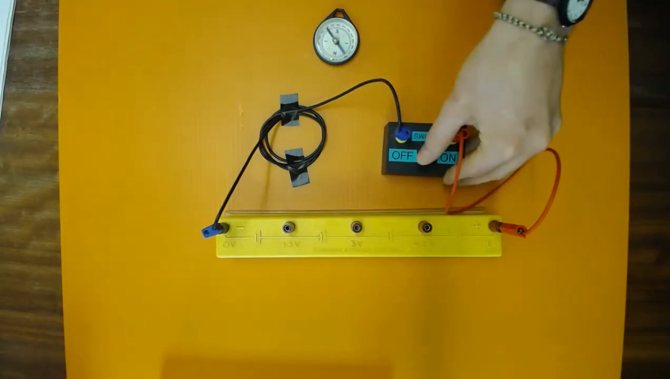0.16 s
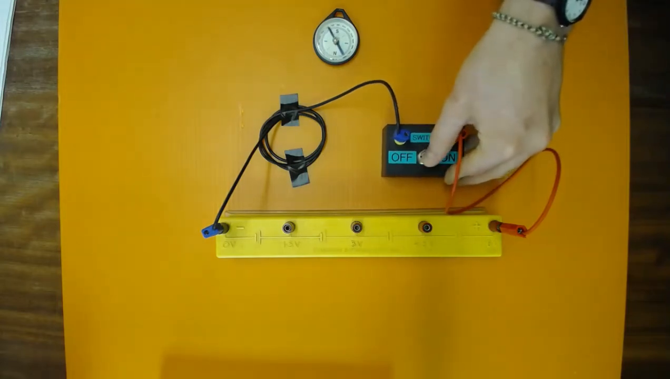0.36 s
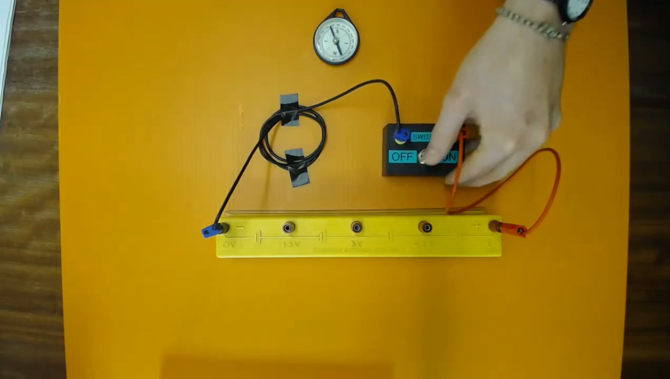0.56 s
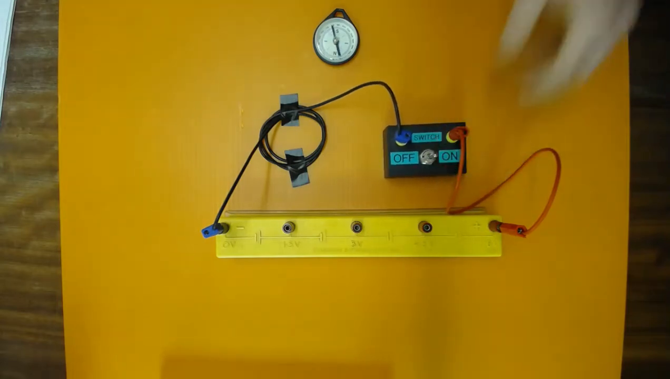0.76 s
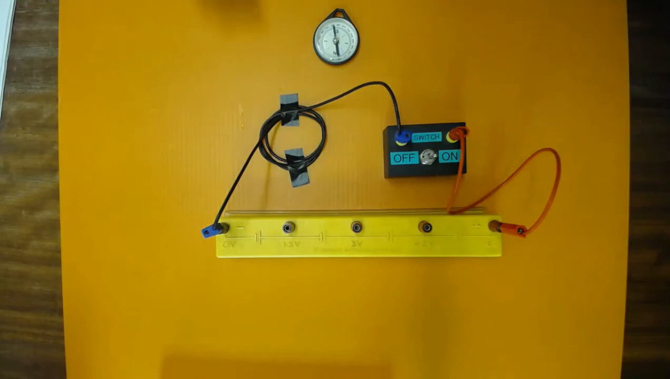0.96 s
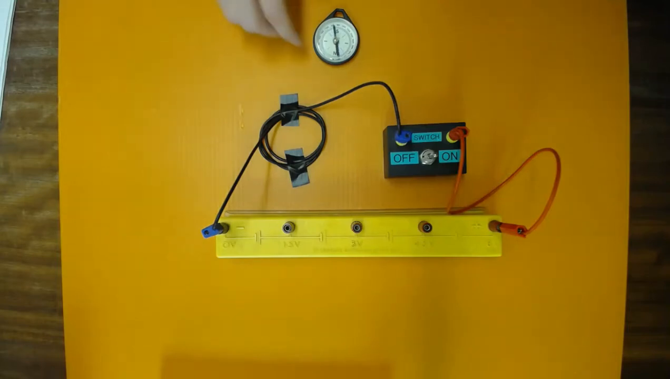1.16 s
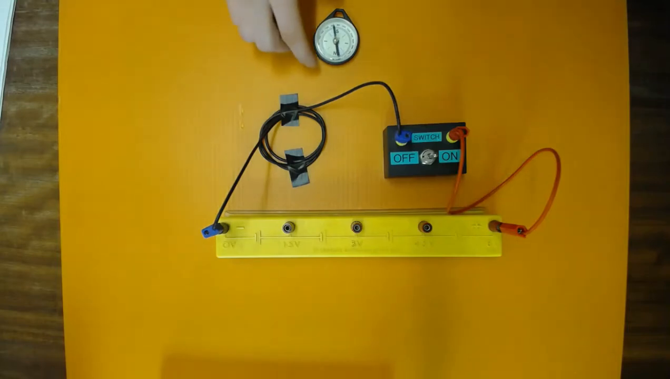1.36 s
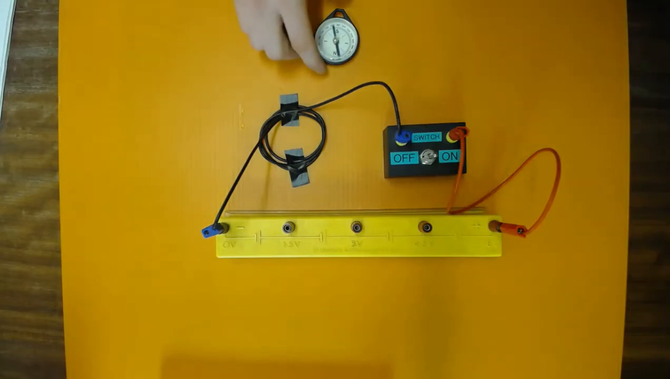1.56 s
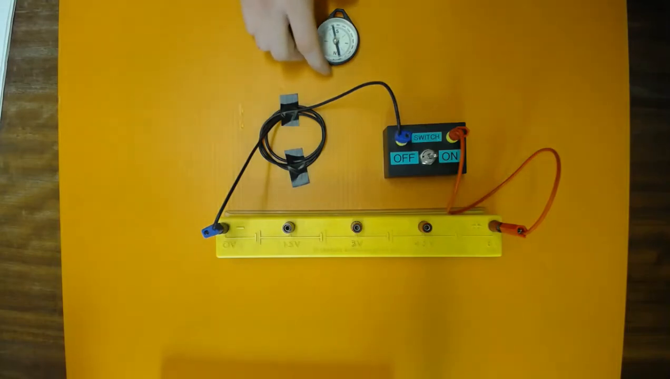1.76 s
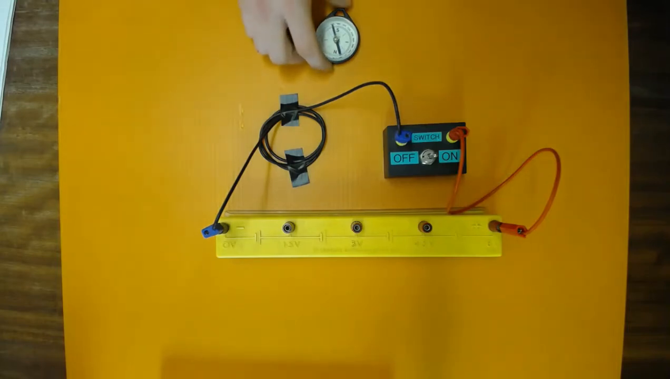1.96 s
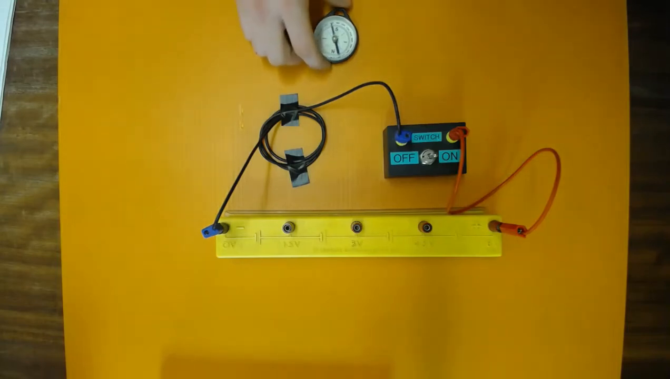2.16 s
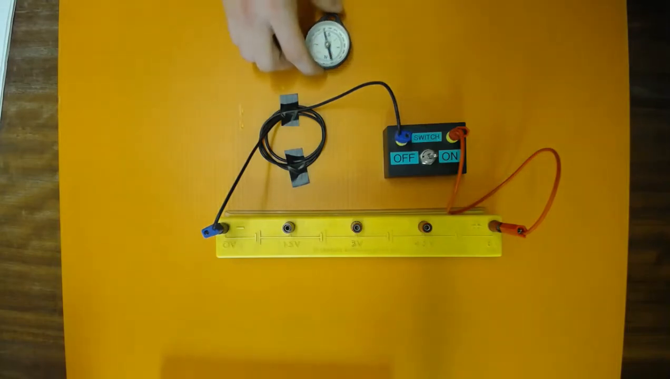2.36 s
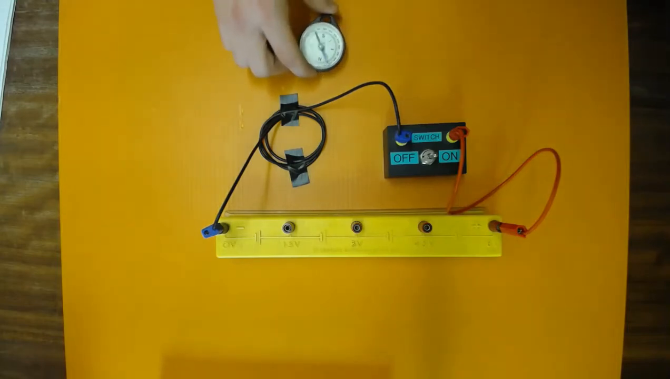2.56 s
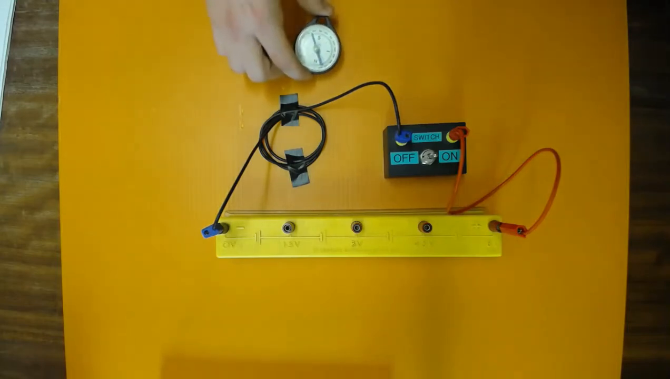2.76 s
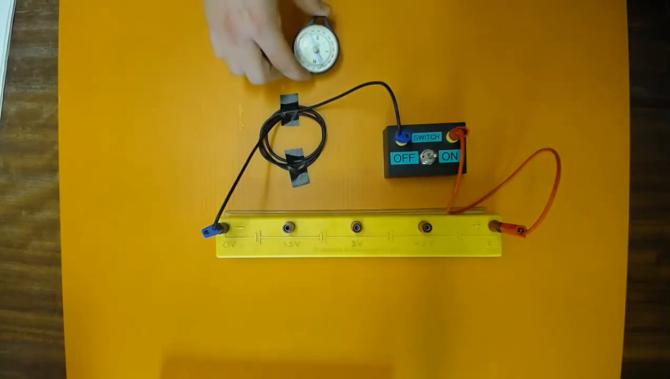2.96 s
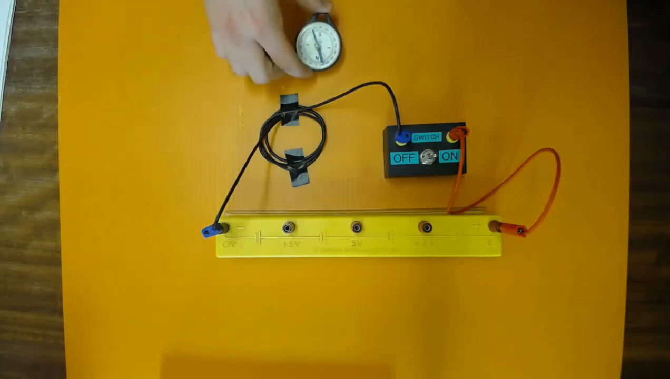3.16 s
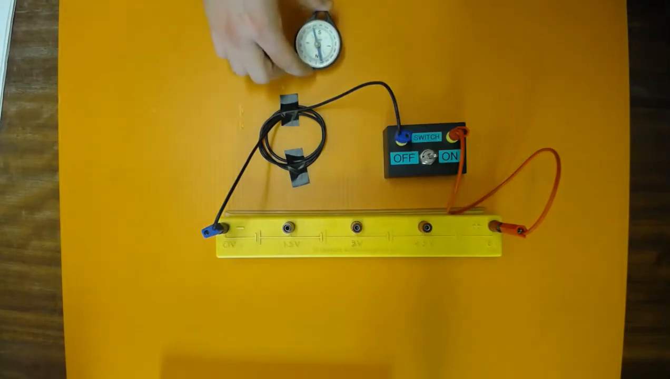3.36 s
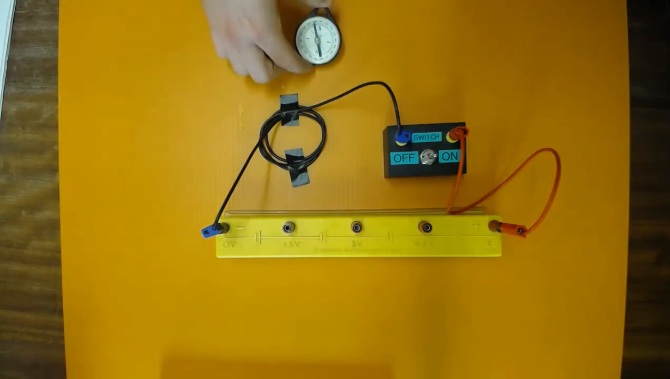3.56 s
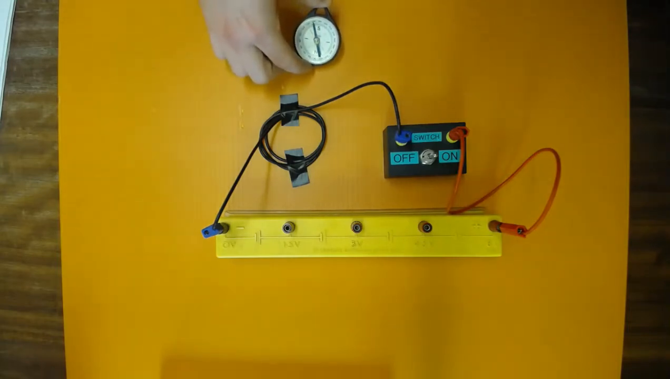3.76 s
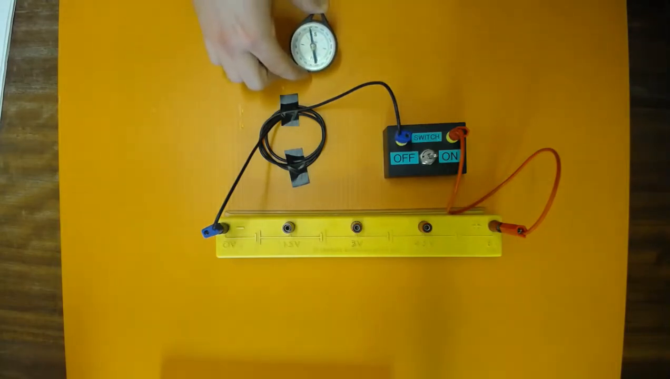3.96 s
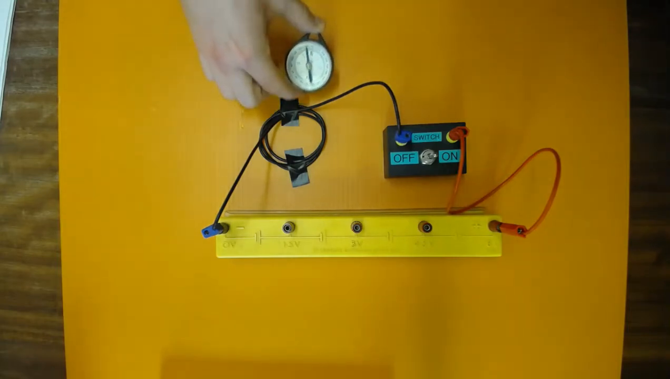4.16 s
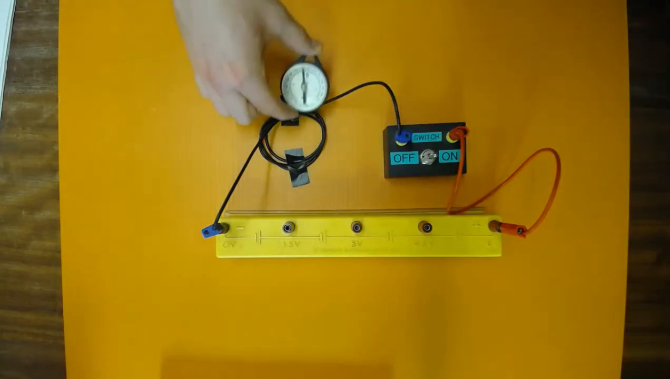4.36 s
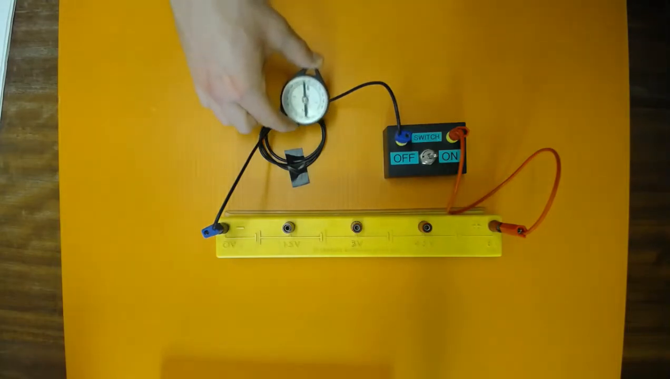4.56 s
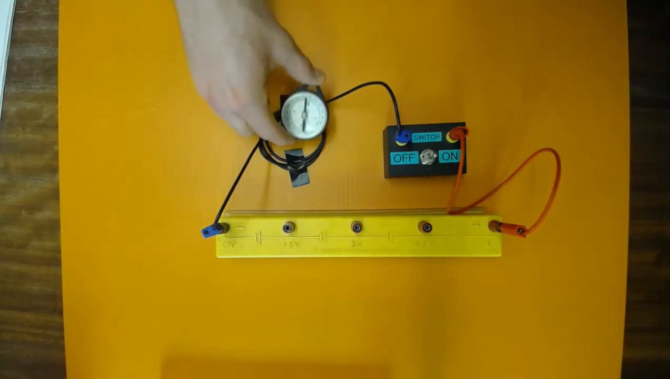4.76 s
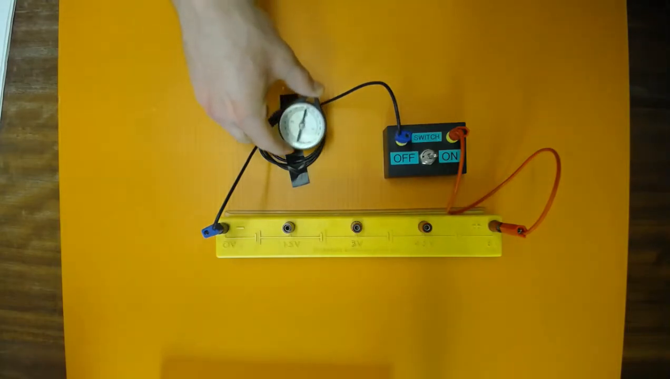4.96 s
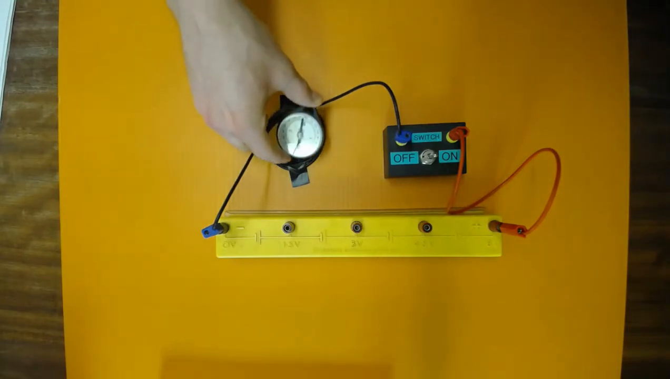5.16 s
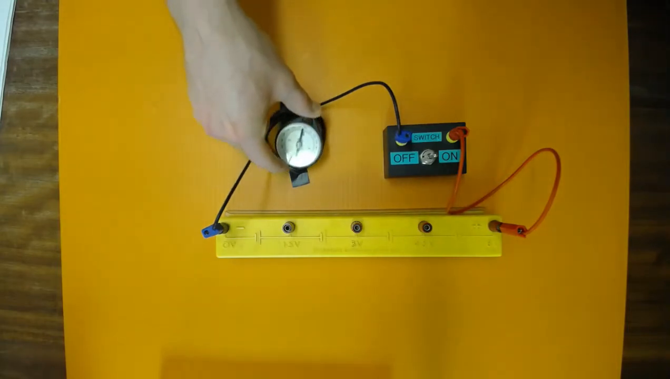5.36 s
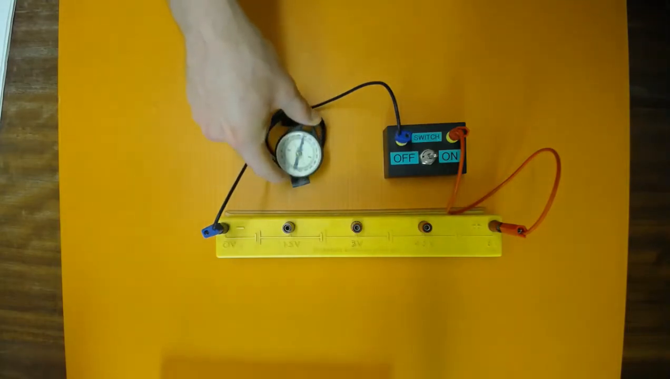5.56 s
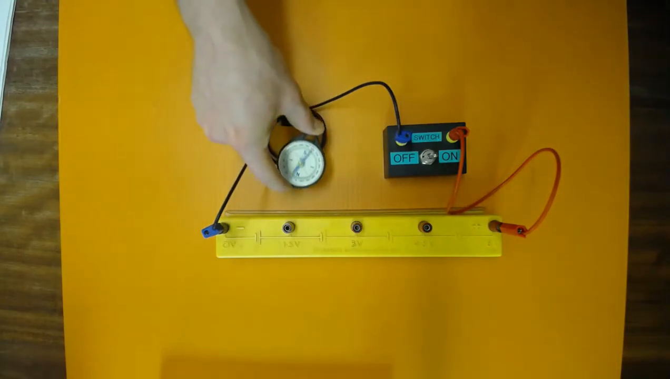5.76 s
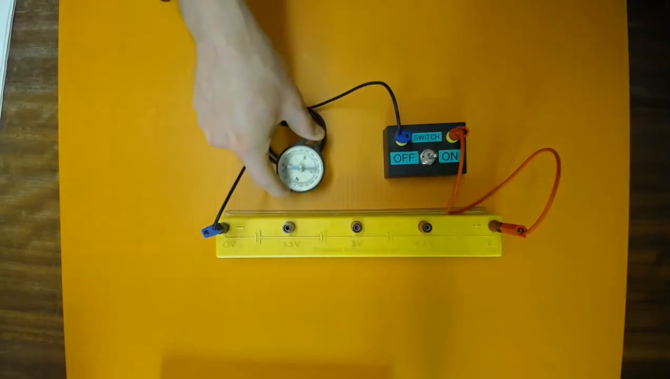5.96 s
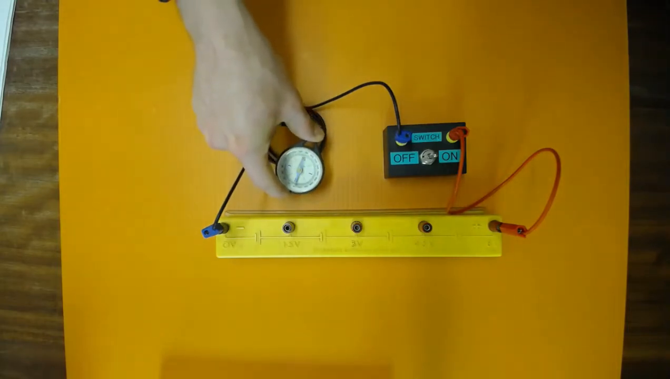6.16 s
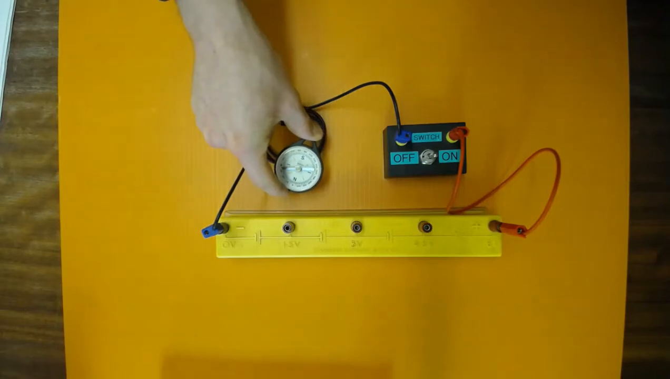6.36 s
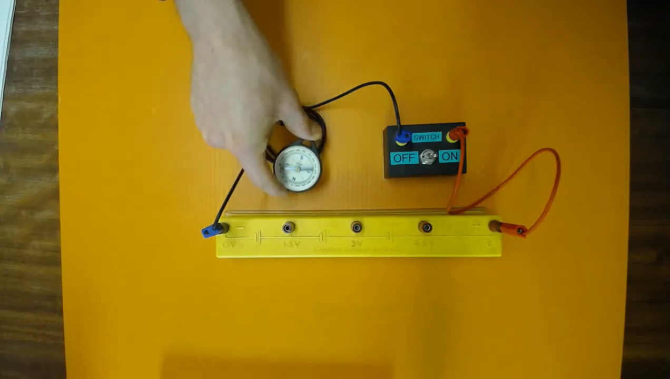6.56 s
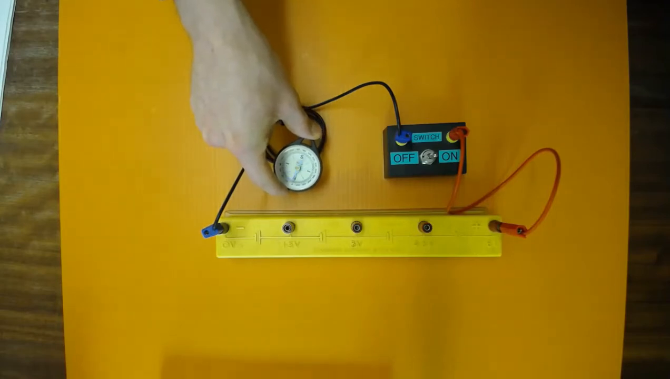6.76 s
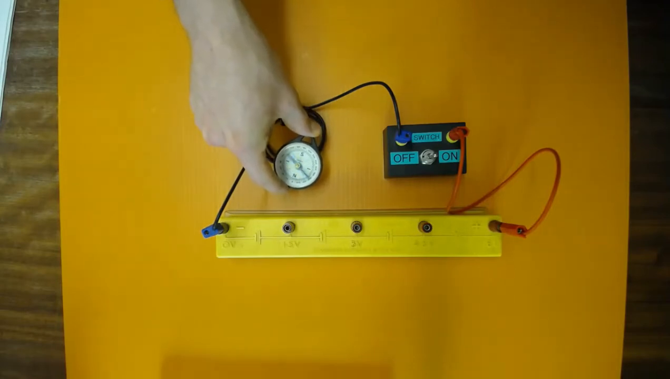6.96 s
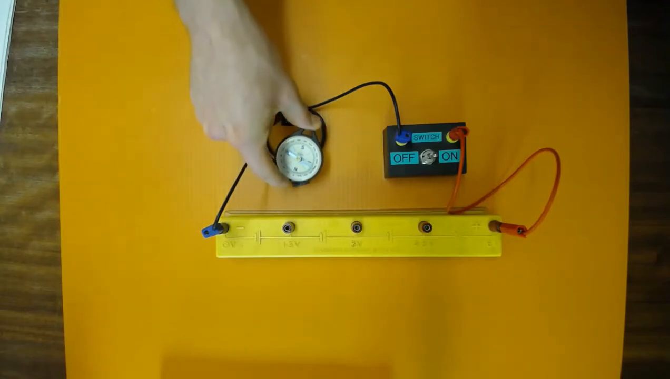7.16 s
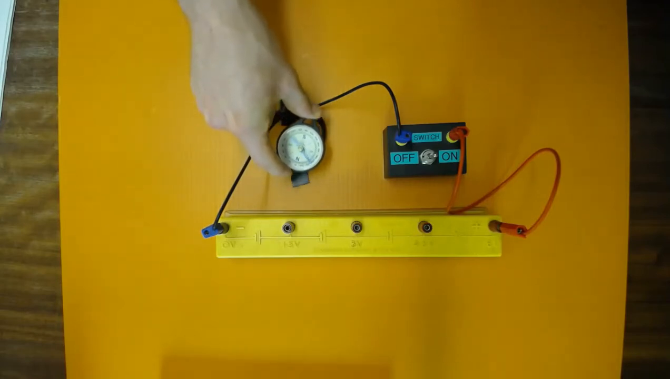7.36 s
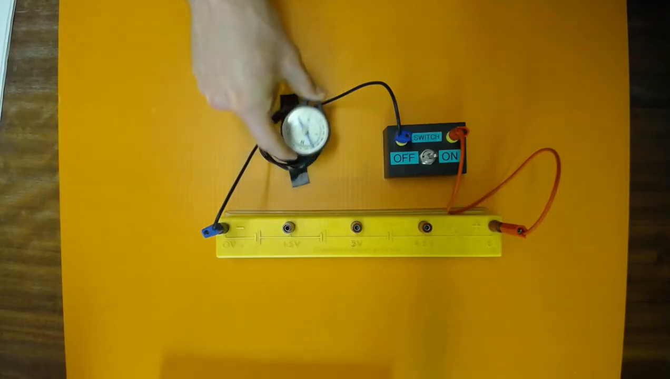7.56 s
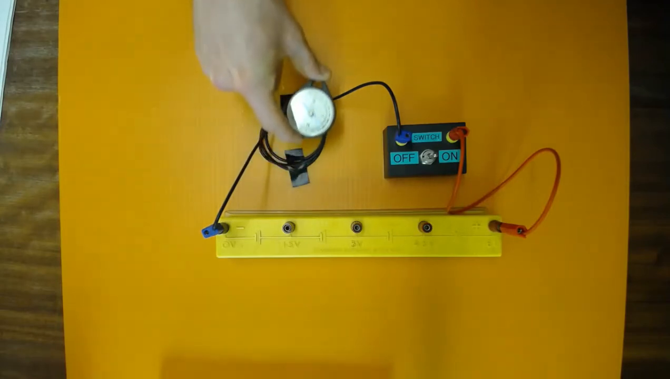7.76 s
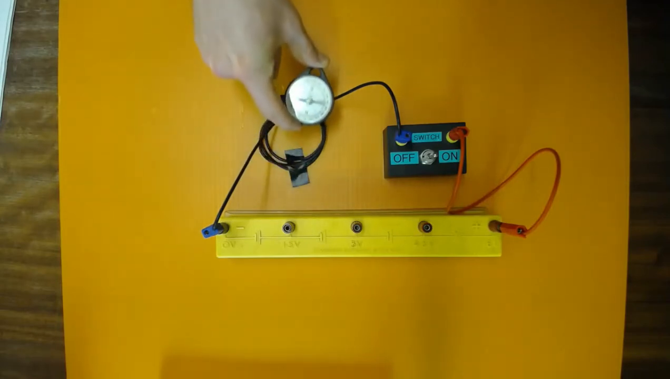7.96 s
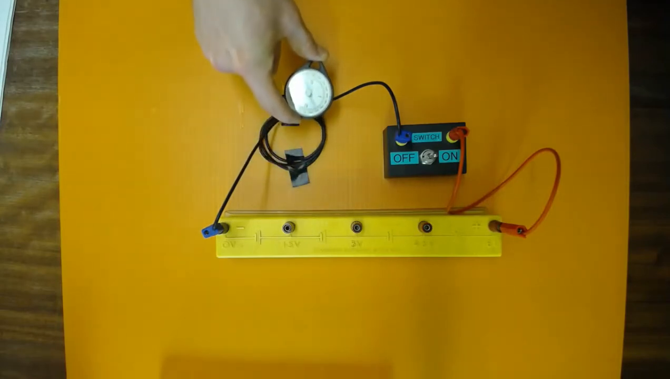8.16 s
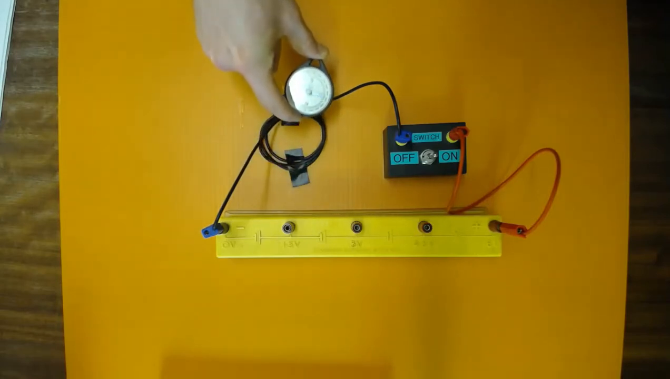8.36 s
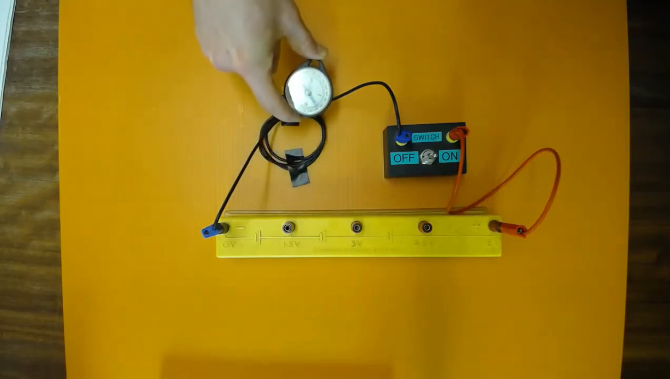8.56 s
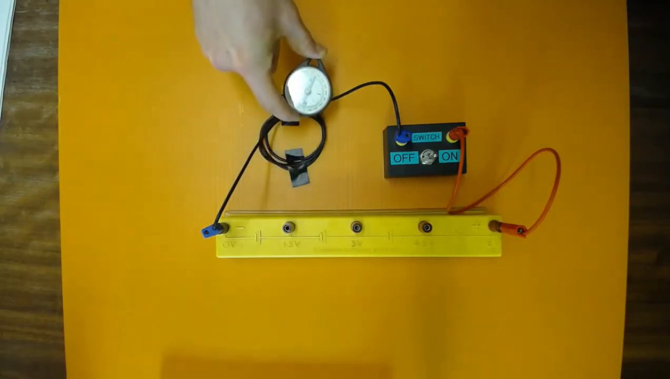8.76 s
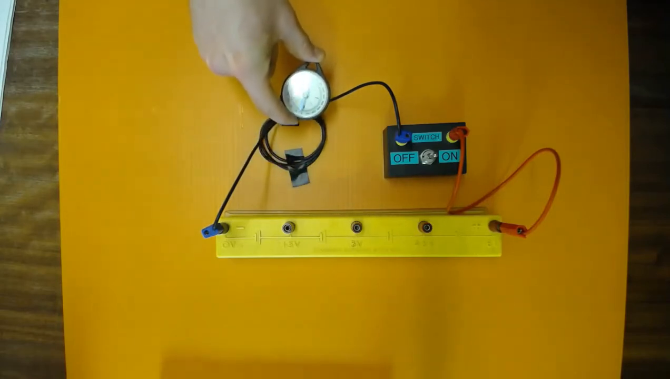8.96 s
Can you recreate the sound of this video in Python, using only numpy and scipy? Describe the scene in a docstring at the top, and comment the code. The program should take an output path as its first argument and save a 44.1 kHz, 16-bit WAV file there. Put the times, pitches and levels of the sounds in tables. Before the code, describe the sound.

A single hard switch snap on a small plastic box in a humming room, then irregular tiny metallic ticks from a handled compass.

```python
"""Toggle switch and pocket compass

Indoors, in a hard, humming room: ventilation, fan tones and a faint electrical whine. A stereo pair hears
a sprung lever slam over once on a small plastic box, right of centre; box modes ring and the table knocks.
A hand slides a pocket compass about: each needle strike is a burst of chatter that rings the metal case.
Filtered noise gives the rubs, the soft boom of the table top and swells in the room's answer to the snap;
a decaying echo answers snap and needle."""
import sys
import numpy as np
from scipy import signal
from scipy.fft import rfft, irfft, next_fast_len
from scipy.io import wavfile
from scipy.ndimage import map_coordinates

SR = 44100
rng = np.random.default_rng(int(sys.argv[2]) if len(sys.argv) > 2 else 0)


def pcm_store(signal):
    """Save signal as 16-bit PCM."""
    levels = np.round(np.clip(np.atleast_2d(signal), -1, 1) * 32767)
    wavfile.write(sys.argv[1], SR, levels.astype(np.int16).T)


N = 397341  # length [samples]

# Ventilation tones before the overall trim: (frequency [Hz], level [dB])
FAN_TONES = [(301.5, -71), (398.4, -78), (495.3, -76.5), (592.2, -82), (678.3, -73.5), (947.5, -87),
             (1012, -76.5), (1125, -89), (1303, -86)]
# Colour of the rush of air: (frequency [Hz], relative density [dB per Hz])
AIR_COLOUR = [(25, -8), (60, -8), (120, -8.5), (250, -9.5), (400, -7.5), (540, -7.5), (700, -2),
              (860, -10.5), (1200, -12.5), (1700, -22), (3000, -28.5), (5000, -35), (8000, -37),
              (10000, -40.5), (15500, -44.5)]
# Faint electrical whine, beating in the treble: (frequency [Hz], level [dB])
WHINE_TONES = [(2080, -95), (3000, -96.5), (7980, -107), (8000, -103), (8020, -107)]
# Likeness of left and right in diffuse sound: (frequency [Hz], correlation [-1 to 1])
LIKENESS = [(60, 0.65), (150, 1), (300, 0.74), (640, 0.88), (1400, 0.12), (3000, 0.015), (15000, 0)]
# Decay of the room: (frequency [Hz], T60 [s])
ROOM_DECAY = [(150, 0.82), (700, 1), (3000, 1.1), (5000, .85), (8000, .58), (14000, .35)]
# Strength of the room's long tail: (frequency [Hz], level [dB])
ROOM_LEVEL = [(150, -14.5), (1400, -15.5), (14000, -19)]
# The snap as it spreads in all directions: (frequency [Hz], relative density [dB per Hz])
SPREAD_COLOUR = [(50, -20), (110, -0.5), (190, 14), (290, 11.5), (470, 4.5), (750, 1.5), (1400, -0.5),
                 (2100, -5.5), (2600, -4.5), (3100, 0.5), (4000, -5), (4900, -1), (5800, -8.5),
                 (7000, -8.5), (10500, -17), (14000, -36)]
# Soft low and mid swells in the room's dying answer to the snap:
# (time [s], level [dB], length [s], frequency [Hz])
SNAP_TAIL_SWELLS = [(.405, -42.5, .055, 255), (.5, -53, 0.17, 260), (.622, -54, 0.032, 800),
                    (.705, -59.5, 0.029, 1138)]

# The hand leans on or drags over the table, before the boom's gains: (time [s], length [s], level [dB])
HAND_PRESSES = [(0.022, 0.11, -60.5), (0.196, 0.04, -60.5), (0.932, 0.073, -64), (2.087, 0.03, -62),
                (2.207, 0.076, -59.5), (2.353, 0.15, -59), (2.698, 0.093, -62.5), (3.552, 0.029, -61.5),
                (3.959, 0.03, -63.5), (4.322, 0.078, -62), (4.5, 0.044, -63), (4.961, 0.074, -59.5),
                (5.781, 0.05, -57.5), (5.925, 0.15, -59)]
# Faint sliding of lever and skin: (time [s], level [dB], length [s], frequency [Hz])
SKIN_BRUSHES = [(.338, -67, 0.016, 3170), (.93, -82.5, 0.19, 9400), (1.82, -83.5, 0.27, 6000),
                (1.968, -71.5, 0.014, 5940)]

# The needle strikes the case:
# (time [s], level before the body trim [dB], favoured pitch [Hz], treble relative to that level [dB])
NEEDLE_STRIKES = [(0.2012, -54.5, 3100, -22.5), (2.2847, -64.5, 3110, -23), (2.384, -43.5, 4020, -31),
                  (2.5286, -55.5, 3810, -23), (2.5768, -45.5, 4440, -22), (2.6851, -48.5, 4360, -19.5),
                  (3.0636, -62.5, 4400, -14), (3.19, -58.5, 4600, -17), (3.2958, -58.5, 4556, -20),
                  (3.3892, -49, 4383, -15.5), (3.4916, -49.5, 4300, -16), (3.612, -57, 4940, -17),
                  (3.7223, -66, 4330, -15), (3.9376, -62.5, 4880, -13.5), (4.1592, -61.5, 3220, -11.5),
                  (4.2837, -49.5, 3320, -13.5), (4.5144, -62.5, 3220, -12), (4.7663, -54, 3110, -13.5),
                  (4.7745, -52.5, 3210, -25), (4.879, -45.5, 3202, -12), (4.9312, -60, 3110, -11),
                  (5.0385, -44.5, 3170, -16), (5.534, -49, 6000, -14), (5.6502, -60.5, 4980, -15),
                  (5.7426, -38.5, 4330, -11), (5.8354, -50, 6000, -5.5), (5.9354, -57.5, 3100, -8),
                  (6.0366, -48.5, 4270, -12.5), (6.1506, -49, 2837, -9.5), (6.3308, -57.5, 6000, -12.5),
                  (6.5739, -61.5, 6000, -8.5), (6.7418, -55.5, 3170, -24), (7.1186, -59.5, 4410, -13.5),
                  (7.235, -65, 6040, -8.5), (7.4594, -71, 2710, -11), (8.096, -48, 3190, -17.5),
                  (8.2068, -55.5, 3190, -14), (8.2688, -57, 6020, -6), (8.3699, -53.5, 6050, -4),
                  (8.4783, -64, 6060, -3)]
# Modes of the compass case: (frequency [Hz], relative level [dB], T60 [s])
CASE_MODES = [(2415, -1.5, .008), (3165, 1.5, 0.017), (3681, -9, .008), (4353, -2, 0.02), (4930, -9.5, .01),
              (6100, 0.5, 0.04067), (6520, -7, 0.0077), (7336, -5.5, 0.0099), (8150, -2.5, 0.016),
              (9740, -10, .008), (11900, -14.5, 0.016)]
# Colour of the needle's click: (frequency [Hz], relative density [dB per Hz])
CLICK_COLOUR = [(1500, -29), (2400, -1), (5000, 0.5), (8000, -1.5), (11000, -14), (16000, -18)]

# Contacts of the snap: (time [s], relative level [dB], length [s])
SNAP_CONTACTS = [(.3800, -16.5, 0.00087), (0.3806, -1, .0014), (.3824, 1.5, 0.0025), (.3868, -18, .004),
                 (.3922, -16.5, .002)]
# Modes of lever and box: (frequency [Hz], relative level [dB], T60 [s])
BOX_MODES = [(1384, -5.5, .018), (1670, -8.5, 0.017), (2108.5, -3.5, 0.032), (2460, -3, .024),
             (3000, 2, 0.012), (3308, -2.5, .028), (3600, -6.5, .015), (4710, -1, .022), (5066, -5, .024),
             (5446, -5.5, 0.017), (6138, -2, 0.0054), (6974, -4, 0.021), (9662, -14, .012),
             (10400, -11.5, 0.016)]
# Modes of the box on the table: (frequency [Hz], relative level [dB], T60 [s])
THUD_MODES = [(199, -7.5, 0.02), (285, 1.5, 0.033), (515, -20.5, .02), (737, 2, 0.023), (985, -4, 0.025)]
# Colour of the snap's crack: (frequency [Hz], relative density [dB per Hz])
CRACK_COLOUR = [(60, -51.5), (400, -26), (1500, -5), (2200, -4.5), (2650, -11.5), (3200, 0), (4100, 2),
                (5000, 7.5), (7000, -1), (8200, -10), (9300, -2), (10500, -3), (12500, -24.5), (16000, -26)]

SNAP_S = SNAP_CONTACTS[0][0]  # first contact
TOP_HZ = 15800  # band limit of both microphones
PRESS_EDGE_S = 0.02  # pressure builds up and eases off this long around each press
# pressure between presses, before the boom's gains: level, unsteadiness, random knots a second
REST_DB, REST_SWING_DB, REST_RATE = -71, 3, 15
CHATTER_S = .005  # how long the needle rattles in one strike
TREBLE_HZ = 5300  # above this the hardness of the contact sets the level
FOCUS_DB = 13.5  # the point of contact favours one pitch: loss of the modes an octave away
ROCK_S, ROCK_SCATTER = .115, .1  # period of the rocking needle, its relative scatter
PAUSE_S = .16  # a longer gap between strikes brings a graze
# a swing that only just touches the case: level before the body trim, pitch, relative treble
GRAZE_DB, GRAZE_HZ, GRAZE_TREBLE_DB = -69, 3200, -16


def amp(db):
    """Decibels to linear gain."""
    return 10 ** (np.asarray(db) / 20)


def unit(x):
    """Scale to rms 1."""
    return x / np.sqrt(np.mean(x ** 2) + 1e-20)


def burst(x):
    """Scale a short sound to the energy of 10 ms at rms 1."""
    energy = np.mean(np.sum(x ** 2, axis=-1))
    return x / np.sqrt(energy / (SR / 100) + 1e-20)


def along(points, hz):
    """Interpolate (frequency [Hz], value) points on a log frequency axis."""
    f, v = np.transpose(points)
    return np.interp(np.log(hz + 1), np.log(f), v)


def wobble(rate):
    """A smooth random curve, rate knots a second."""
    knots = rng.standard_normal(int(N * rate / SR) + 4)
    return map_coordinates(knots, [np.arange(N) * rate / SR])


def filtered(x, response):
    """Multiply the spectrum of x by a response of frequency."""
    n = x.shape[-1]
    m = next_fast_len(n + 4096)
    hz = np.fft.rfftfreq(m, 1 / SR)
    return irfft(rfft(x, m) * response(hz), m)[..., :n]


def coloured(x, points):
    """Filter x to a colour given as (frequency [Hz], level [dB]) points."""
    return filtered(x, lambda hz: amp(along(points, hz)))


def band(hz, centre, width):
    """Complex gain of one resonance."""
    return 1j * hz * width / (centre ** 2 - hz ** 2 + 1j * hz * width)


def add(track, s, x):
    """Mix x into the track at s seconds."""
    i = max(round(s * SR), 0)
    track[..., i:i + x.shape[-1]] += x[..., :N - i]


def diffuse(size):
    """Stereo noise from all around: alike in the bass, unrelated in the treble."""
    def mid_side_gains(hz):
        turn = np.arccos(np.clip(along(LIKENESS, hz), -1, 1)) / 2
        return np.array([np.cos(turn), np.sin(turn)])

    mid, side = filtered(rng.standard_normal((2, size)), mid_side_gains)
    return np.array([mid + side, mid - side])


def swell(length, size):
    """One smooth rise and fall lasting length seconds."""
    return np.sin(np.pi * np.clip(np.arange(size) / SR / length, 0, 1))


def chatter(length, apart, size=8192):
    """Rattling contact force as swelling noise, a little different left and right."""
    common, differing = rng.standard_normal((2, size))
    return swell(length, size) * np.array([common + apart * differing, common - apart * differing])


def ring(force, modes, low_hz):
    """Damped modes driven by a force; a small body radiates little below low_hz."""
    t = np.arange(force.shape[-1]) / SR
    hz, db, t60 = np.transpose(modes)[..., None]
    tones = amp(-60 * t / t60) * np.sin(2 * np.pi * hz * t)
    rings = signal.fftconvolve(force[None], tones[:, None], axes=-1)[..., :len(t)]
    body = sum(amp(level) * burst(one) for level, one in zip(db, rings))
    high_pass = signal.butter(4, low_hz, "high", fs=SR, output="sos")
    return signal.sosfilt(high_pass, body)


def ventilation(air_db=-64, hum_db=-1.0, drift=0.99, flutter_db=3.5):
    """Steady rush of air as diffuse noise, with fan tones, the higher ones less steady."""
    t = np.arange(N) / SR
    air = unit(coloured(diffuse(size=N), AIR_COLOUR))
    hum = 0
    for hz, db in FAN_TONES:
        phase = 2 * np.pi * hz * t + drift * hz / FAN_TONES[0][0] * wobble(5)
        level = amp(db + flutter_db * hz / FAN_TONES[-1][0] * wobble(24))
        hum = hum + level * np.sqrt(2) * np.sin(phase)
    return amp(air_db + .3 * wobble(4.1)) * air + amp(hum_db) * hum


def whine(flutter_db=2.5, drift=.6):
    """Thin electrical tones, slightly wavering in level and phase."""
    t = np.arange(N) / SR
    tones = 0
    for hz, db in WHINE_TONES:
        level = amp(db + flutter_db * wobble(9))
        tones = tones + level * np.sqrt(2) * np.sin(2 * np.pi * hz * t + drift * wobble(12))
    return tones


def room(x, early_db=-20, early_t60=0.22, gap_s=0.0066):
    """Near surfaces answer with a short decay; the long tail dies sooner in the treble."""
    t = np.arange(SR) / SR
    hz, times, z = signal.stft(diffuse(size=SR), SR, nperseg=256)
    t60 = along(ROOM_DECAY, hz)[:, None]
    # the root evens out the energy of long and short decays
    fade = amp(-60 * times / t60) * np.sqrt(2 * np.log(1000) / (t60 * SR))
    level = amp(along(ROOM_LEVEL, hz))[:, None]
    tail = signal.istft(z * fade * level, SR, nperseg=256)[1][:, :SR]
    early = diffuse(size=SR) * amp(-60 * t / early_t60)
    answer = tail + amp(early_db) * early / np.linalg.norm(early[0])
    onset = np.clip(t / gap_s - 1, 0, 1)  # silent for gap_s, then fades in over as long
    return signal.fftconvolve(x, answer * onset, axes=1)[:, :N]


def noise_swells(rows, spread):
    """Band noise that rises and falls smoothly, each swell around its own pitch."""
    out = np.zeros((2, N))
    for s, db, length, centre in rows:
        noise = diffuse(size=22050)
        grain = unit(filtered(noise, lambda hz: abs(band(hz, centre, spread * centre)) ** 3))
        add(out, s, amp(db) * swell(length, size=22050) * grain)
    return out


def snap_tail_swells():
    """Soft low and mid swells of noise in the room's dying answer to the snap."""
    return noise_swells(SNAP_TAIL_SWELLS, spread=.8)


def table(boom_hz=178, width_hz=13, boom_db=1, rumble_db=-8, press_db=1):
    """The table top booms at its lowest mode over a low rumble, more when the hand presses on it."""
    pressure = amp(REST_DB + REST_SWING_DB * wobble(REST_RATE))
    for s, length, db in HAND_PRESSES:
        press = np.zeros(N)
        shape = swell(length + 2 * PRESS_EDGE_S, size=SR)
        add(press, s - PRESS_EDGE_S, amp(db + press_db) * shape)
        pressure = np.maximum(pressure, press)
    noise = rng.standard_normal(N)
    mode = signal.hilbert(filtered(noise, lambda hz: band(hz, boom_hz, width_hz) ** 2))
    boom = unit(np.cos(np.angle(mode)))  # keeps the wandering phase, with a steady level
    rumble = unit(filtered(diffuse(size=N), lambda hz: band(hz, centre=95, width=65) ** 2))
    return pressure * (amp(boom_db) * boom + amp(rumble_db) * rumble)


def rubs():
    """Short strokes of friction of lever and skin, as swells of band noise."""
    return noise_swells(SKIN_BRUSHES, spread=.9)


def strikes():
    """The needle's strikes; before a pause it rocks once more, one period later, and grazes the case."""
    times = np.array([row[0] for row in NEEDLE_STRIKES])
    pauses = np.diff(times, append=N / SR)
    swings = times + ROCK_S * (1 + ROCK_SCATTER * rng.standard_normal(len(times)))
    grazes = [(s, GRAZE_DB, GRAZE_HZ, GRAZE_TREBLE_DB) for s in swings[pauses > PAUSE_S]]
    return list(NEEDLE_STRIKES) + grazes


def compass(ring_db=-2, noise_db=3, settle_db=-19, settle_s=0.017, scatter_db=-10.5, scatter_t60=.11,
            body_db=-6):
    """The loose needle chatters against the case, then settles; grip and touch alter the modes."""
    out = np.zeros((2, N))
    for s, db, pitch, treble_db in strikes():
        colour = lambda hz: -FOCUS_DB * np.sqrt(abs(np.log2((hz + 1) / pitch)))
        force = chatter(CHATTER_S, apart=0.65) + amp(settle_db) * chatter(settle_s, apart=.8)
        grip = 1 + .02 * rng.standard_normal(len(CASE_MODES))  # detunes each mode
        modes = [(hz * shift, level + colour(hz), t60)
                 for (hz, level, t60), shift in zip(CASE_MODES, grip)]
        # hand, wires and table scatter the click into a short noisy tail
        t = np.arange(force.shape[-1]) / SR
        scatter = burst(rng.standard_normal(force.shape) * amp(-60 * t / scatter_t60))
        click = burst(coloured(burst(force) + amp(scatter_db) * scatter, CLICK_COLOUR))
        click = filtered(click, lambda hz: amp(colour(hz)))
        tick = amp(ring_db) * ring(force, modes, low_hz=2130) + amp(noise_db) * click
        # body and treble are split so that each takes its own level
        body = filtered(tick, lambda hz: 1 / (1 + (hz / TREBLE_HZ) ** 16))
        treble = tick - body
        add(out, s, amp(db + body_db) * burst(body) + amp(db + treble_db) * burst(treble))
    return out


def snap_spread(db=-17):
    """What the walls receive of the snap: one short pulse, averaged over all directions."""
    pulse = np.zeros((2, N))
    pulse[:, round(SNAP_CONTACTS[2][0] * SR)] = 1
    return amp(db) * burst(coloured(pulse, SPREAD_COLOUR))


def switch(ring_db=-25.5, crack_db=-25.0, thud_db=-25.0, thud_s=.3822, rebound_s=.0041, rebound_db=-8,
           lead_s=.00005):
    """The sprung lever slams over and rebounds; the box rings and knocks twice on the table."""
    force, out = np.zeros((2, N)), np.zeros((2, N))
    for s, db, length in SNAP_CONTACTS:
        add(force, s - SNAP_S, amp(db) * burst(chatter(length, apart=.4)))
    force = force[:, :SR // 4]
    crack = burst(coloured(force, CRACK_COLOUR))
    add(out, SNAP_S, amp(ring_db) * ring(force, BOX_MODES, low_hz=950) + amp(crack_db) * crack)
    push = swell(length=0.00097, size=8192)
    knocks = push + amp(rebound_db) * np.roll(push, round(rebound_s * SR))
    add(out, thud_s, amp(thud_db) * ring(knocks[None], THUD_MODES, low_hz=160))
    # the box stands to the right, so that side hears it first, by lead_s
    return filtered(out, lambda hz: np.exp(np.pi * hz * lead_s * np.array([[-1j], [1j]])))


def scene():
    """Room sound, handling, needle and snap; the walls answer the snap and the needle."""
    background = ventilation() + whine()
    handling = rubs() + table()
    ticks = compass()
    answer = room(snap_spread() + amp(-3) * ticks) + snap_tail_swells()
    return background + handling + answer + ticks + switch()


def record(dry):
    """The left microphone has a little more bass; both fall off steeply at the band limit."""
    lean = [(400, 0.65), (1200, 0.14), (8000, -0.27)]  # (frequency [Hz], left gain and right loss [dB])
    limit = lambda hz: 1 / np.sqrt(1 + (hz / TOP_HZ) ** 200)
    return filtered(dry, lambda hz: amp(np.outer([1, -1], along(lean, hz))) * limit(hz))


dry = scene()
out = record(dry)
pcm_store(out)
```